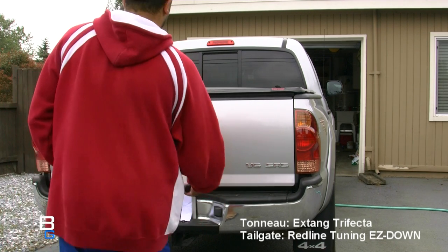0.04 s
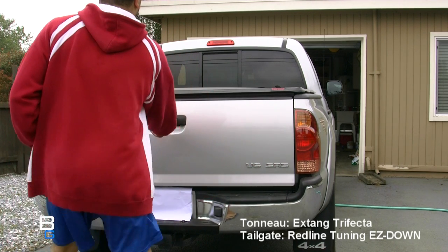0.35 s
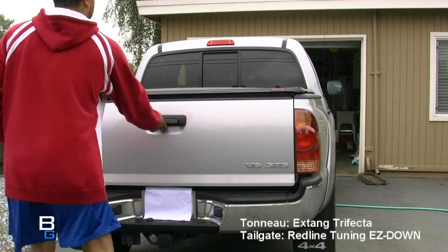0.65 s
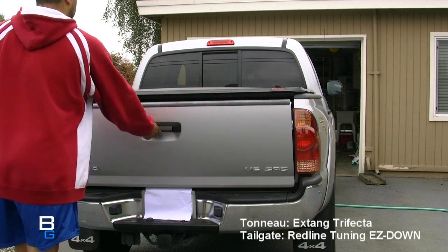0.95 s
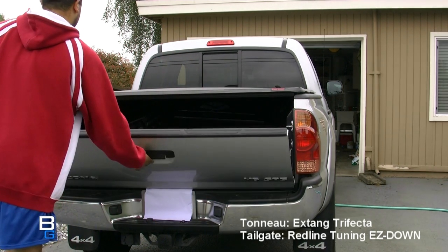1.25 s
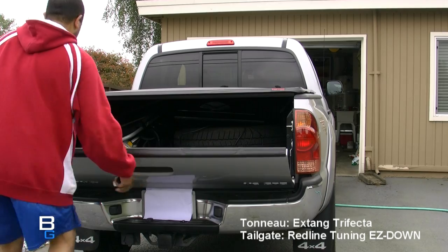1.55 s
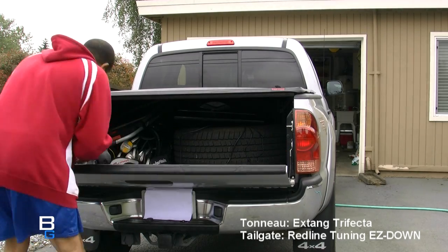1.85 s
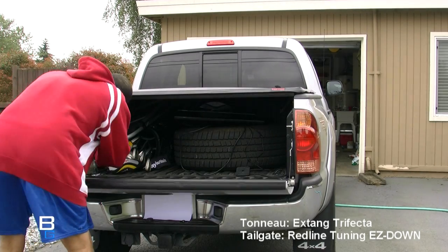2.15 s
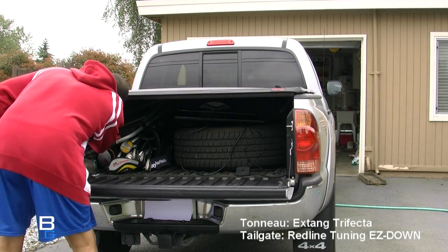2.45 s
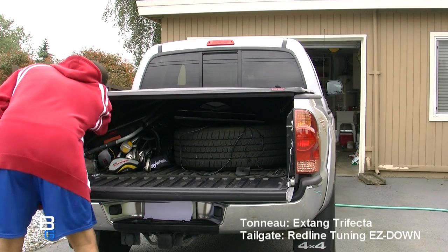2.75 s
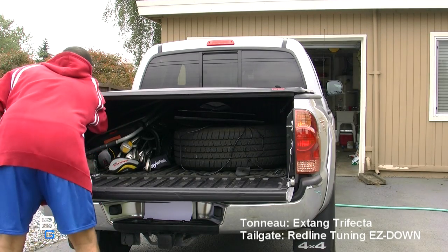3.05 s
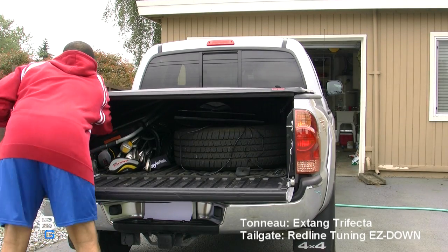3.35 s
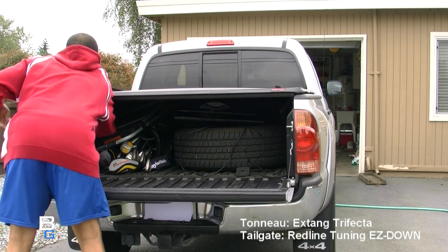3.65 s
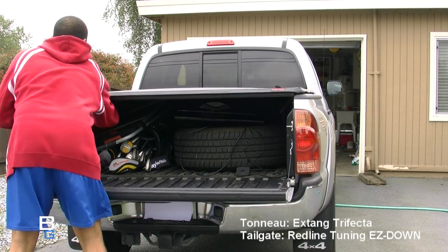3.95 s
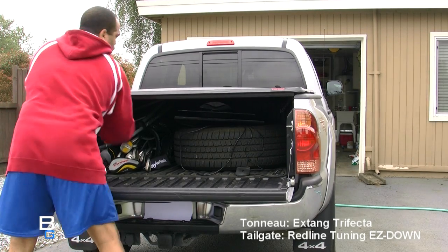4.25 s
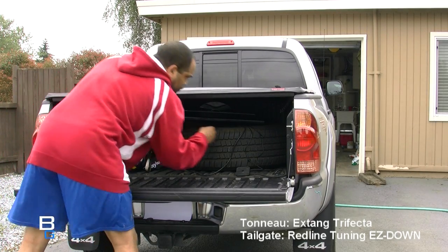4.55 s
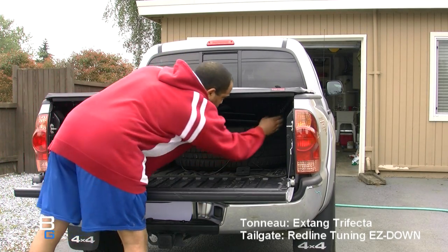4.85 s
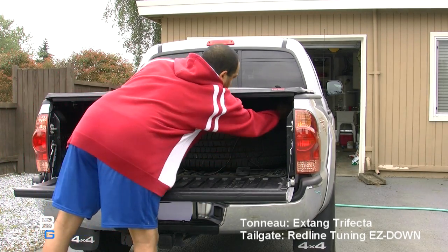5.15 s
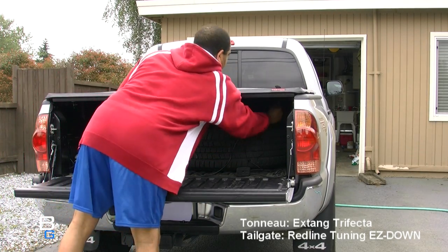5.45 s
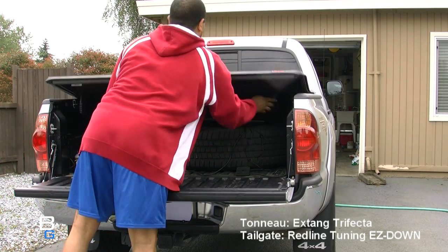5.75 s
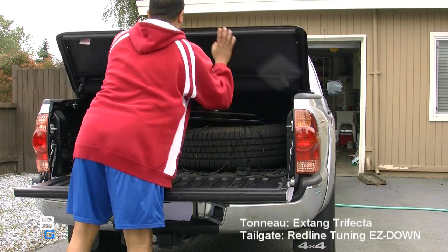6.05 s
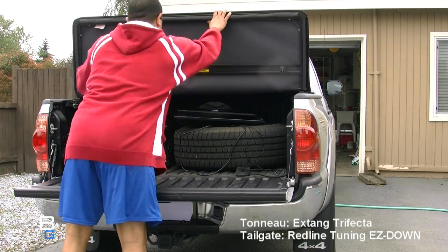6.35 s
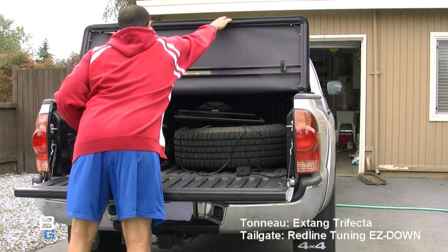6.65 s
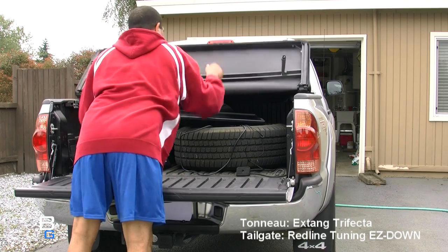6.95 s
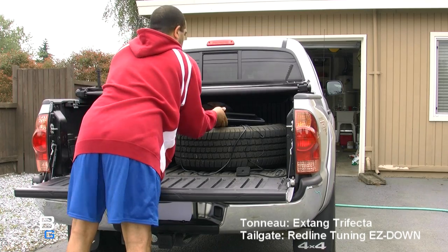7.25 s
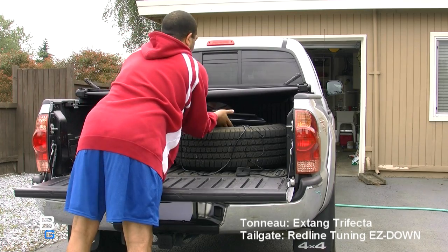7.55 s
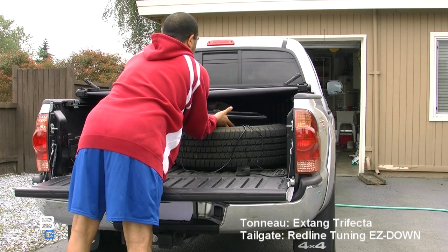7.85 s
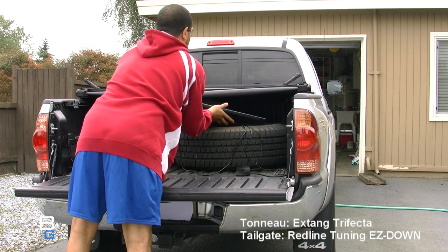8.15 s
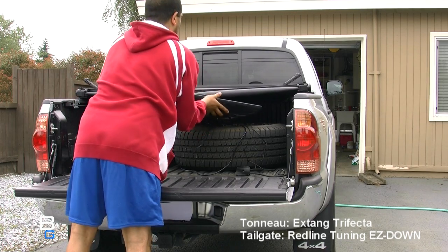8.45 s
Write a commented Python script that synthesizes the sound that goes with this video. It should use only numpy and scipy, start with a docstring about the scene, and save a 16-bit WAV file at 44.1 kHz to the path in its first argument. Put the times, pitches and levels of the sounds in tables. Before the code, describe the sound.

Shoe scuffs and rustling clothes open the scene, close to the back of a pickup. The handle clicks at about 0.4 seconds and the latch snaps open with a short metallic ring at 0.7. From 1.1 seconds the tailgate sinks with a brief, hoarse, slightly rising whine, landing with a loud clunk at 1.5. Soft knocks and thuds follow, then a cover clamp clicks at 3.1 and drops with a clunk at 3.8. Between 5 and 7 seconds there are quieter thuds, scrapes and ticks as the bed cover is lifted. It falls back with a rattling slam at 7.2. Sharp clacks come at 7.4 and 7.6, and gear bumps hollowly on the spare tyre until about 8.5. Throughout, small birds chirp faintly now and then over a distant outdoor hum.

```python
"""A pickup's tailgate is unlatched, sinks on a damper that whines by stick-slip, and lands on its cables.
The bed cover is unclamped and folded back with a slam, and gear is shifted on the spare tyre.
Each impact gives a burst of noise, coloured by the steel bed; struck parts ring in their damped modes.
Clothes rustle by friction, small birds chirp with echoes, and the neighbourhood hums far away."""
import sys
import numpy as np
from scipy import signal
from scipy.io import wavfile

SR = 44100
rng = np.random.default_rng(int(sys.argv[2]) if len(sys.argv) > 2 else 0)


def unload_audio(sound):
    """Save the sound as a 16-bit wav file, at the path given as the first command line argument."""
    columns = np.transpose(np.atleast_2d(sound))
    # keep every value between -1 and 1, then stretch to whole-number steps
    steps = np.round(np.clip(columns, -1, 1) * 32767)
    wavfile.write(sys.argv[1], SR, steps.astype(np.int16))


N = 384111
TIME = np.arange(N) / SR
EDGES = np.geomspace(31, 16400, 20)  # band edges, f/Hz
CENTRES = np.sqrt(EDGES[1:] * EDGES[:-1])
BAND_OCTAVES = np.log2(EDGES[1] / EDGES[0])

# stroke of the tailgate damper: t/s, slip rate f/Hz, level/dB (levels in all tables are relative)
DAMPER_STROKE = [(1.05, 268, -76), (1.12, 268, -50), (1.2, 277, -42.5), (1.3, 288, -41.5),
                 (1.36, 299, -39.5), (1.41, 320.4, -42), (1.47, 320, -42), (1.525, 322, -46),
                 (1.55, 323, -94)]
# radiation response of the tailgate skin: f/Hz, level/dB
SKIN_RESPONSE = [(800, -57), (1300, -1.5), (1750, 4), (2050, 7), (2350, -15), (3200, 4), (3900, -2),
                 (4400, -17), (5500, 7), (6200, -4)]


def from_db(db):
    """Amplitude ratio of a level."""
    return 10 ** (np.asarray(db) / 20)


def rms_one(x):
    """Normalisation to unit power."""
    return x / np.sqrt(np.mean(x ** 2) + 1e-20)


def in_time(rows, t=TIME):
    """Linear interpolation of each column in time."""
    times, *columns = np.transpose(rows)
    return [np.interp(t, times, column) for column in columns]


def at_hz(points, hz):
    """Interpolation on a logarithmic frequency axis."""
    f, value = np.transpose(points)
    return np.interp(np.log(hz), np.log(f), value)


def drift(rate, size=N):
    """Random modulation: Gaussian values, `rate` a second, joined by straight lines."""
    knots = rng.standard_normal(size // 8)
    return np.interp(np.arange(size) * rate / SR, np.arange(len(knots)), knots)


def add(out, onset, sound):
    """Superposition of a sound from `onset` seconds on."""
    start = round(onset * SR)
    sound = sound[..., max(-start, 0):N - start]
    start = max(start, 0)
    out[..., start:start + sound.shape[-1]] += sound


def noise_bands(correlation):
    """Half-octave stereo noise: the ratio of mid to side sets the left-right correlation."""
    white, bands = rng.standard_normal((2, 2, N)), []
    for k, hz in enumerate(CENTRES):
        bandpass = signal.butter(2, EDGES[k:k + 2], "band", fs=SR, output="sos")
        mid, side = signal.sosfilt(bandpass, white[k % 2])
        alike = np.clip(at_hz(correlation, hz), -1, 1)
        bands.append(rms_one(np.sqrt(1 + alike) * mid + np.sqrt(1 - alike) * side * [[1], [-1]]))
    return np.array(bands, dtype=np.float32)


def coloured(bands, band_db):
    """Spectral shaping: a weighted sum of noise bands, at unit power."""
    return rms_one(np.tensordot(from_db(band_db).astype(np.float32), bands, 1))


def off_centre(x, lag_s, pan_db):
    """Time and level differences: sound from the left arrives there earlier and louder."""
    return np.array([x, np.interp(TIME - lag_s, TIME, x)]) * from_db([[pan_db / 2], [-pan_db / 2]])


def contacts(bands, rows, spectrum, rise_share, grain_db, grain_hz, tail_db, bass_hold, bass_lag_s):
    """Modal overlap: tiny impacts on crowded panel modes merge into decaying noise with a reverberant tail."""
    # colour common to all contacts: f/Hz, level/dB
    common_colour = [(35, -36), (55, -39), (80, -41), (115, -3.5), (170, 0), (330, -6.5), (500, -3),
                     (2000, 0.5), (7000, 0.5), (9500, 3.5), (12500, -22.5), (15500, 5)]
    # reverberation of bed and yard: f/Hz, T60/s
    reverb_t60 = [(70, 0.78), (210, 0.32), (560, 0.24), (1500, 0.36), (4000, 0.38), (10000, 0.3)]
    out, hz = np.zeros((2, N)), CENTRES[:, None]
    t = TIME[:int(.7 * SR)]
    tail_power = from_db(2 * (tail_db - 60 * t / at_hz(reverb_t60, hz))) * (1 - np.exp(-t / 0.0064))
    grain = from_db(grain_db * drift(grain_hz))
    bass_share = 1 / (1 + (hz / 450) ** 2)
    colour_db = at_hz(spectrum, CENTRES) + at_hz(common_colour, CENTRES)
    for onset, db, tilt, t60 in rows:
        start = max(round(onset * SR), 0)
        n = min(len(t), N - start)
        rise = rise_share * t60  # soft contacts both start and end slowly
        # dispersion: low bending waves arrive later; they also last longer
        swell = max(rise, 1e-4) + bass_lag_s * bass_share
        decay = t60 * (1 + bass_hold * bass_share)
        shape = np.minimum(t[:n] / swell, 1) * from_db(-60 * np.clip((t[:n] - swell) / decay, 0, 2))
        rough = shape * (bass_share + (1 - bass_share) * grain[start:start + n])
        noise = bands[:, :, start:start + n]
        # the strength of the blow sets the energy in every band
        rough *= np.sqrt(np.sum(shape ** 2, axis=1) / np.sum((rough * noise[:, 0]) ** 2, axis=1))[:, None]
        envelope = np.sqrt(rough ** 2 + tail_power[:, :n] * (t60 + rise))
        tilt_db = tilt * np.log2(CENTRES / 1430)  # harder surfaces sound brighter
        gain = np.sqrt(BAND_OCTAVES) * from_db(db + colour_db + tilt_db)
        add(out, onset, np.einsum("bt,bct->ct", envelope * gain[:, None], noise))
    return out


def struck(modes, blows, rise_s):
    """Free vibration: each blow excites damped modes with random phase and 1.5 dB of scatter."""
    out, t = np.zeros(N), TIME[:SR]
    hz, mode_db, t60 = np.transpose(modes)[:, :, None]
    for onset, db in blows:
        phase = rng.uniform(0, 2 * np.pi, hz.shape)
        amplitude = from_db(db + mode_db + 1.5 * rng.standard_normal(hz.shape) - 60 * t / t60)
        ring = np.sum(amplitude * np.sin(2 * np.pi * hz * t + phase), axis=0)
        add(out, onset, ring * (1 - np.exp(-t / rise_s)))
    return out


def neighbourhood():
    """Ambient field: noise of far traffic and leaves from all sides, and briefly a thin sizzle."""
    # spectral density: f/Hz, level/dB
    density = [(15, -45), (25, -38), (80, 7), (114, 2.5), (476, -3.5), (863, -6), (1440, -13), (2350, -19),
               (3520, -23), (6050, -23.5), (11300, -27.5), (14400, -29), (16000, -44)]
    # left-right likeness: f/Hz, correlation (clipped at -1)
    correlation = [(30, .6), (60, 0.45), (110, 0.43), (200, -1.12), (380, -0.78), (1200, -0.55),
                   (2400, -1.5), (8000, 0.099), (15000, -0.62)]
    # swell of the sizzle: t/s, level/dB
    swell = [(4.05, -97), (4.3, -71), (4.6, -65.5), (4.9, -67), (5.15, -92)]
    hum = coloured(noise_bands(correlation), at_hz(density, CENTRES) + 10 * np.log10(CENTRES))
    bandpass = signal.butter(2, [10800, 12700], "band", fs=SR, output="sos")
    sizzle = rms_one(signal.sosfilt(bandpass, rng.standard_normal(N)))
    return from_db(-48.5) * hum + from_db(in_time(swell)[0]) * sizzle


def birds(echo_db, echo_t60, direct_db, waver_hz, wander, octave_db):
    """Frequency modulation: wavering whistles, convolved with echoes from house and fence."""
    # phrases: t/s from the onset, f/Hz, level/dB
    twitter = [(0, 6300, -18), (.016, 5400, 1), (.024, 3200, -0.5), (.047, 4500, 6.5), (.058, 4340, -1),
               (.064, 3650, 10), (.08, 3060, -2), (.089, 3620, -16), (.098, 3020, 4.5), (.117, 3800, 1),
               (.123, 2900, 7), (.133, 2800, -10)]
    whistle = [(0, 6700, -5), (.03, 7250, -3), (.065, 7200, -6), (.09, 6200, -5), (.105, 5750, -25)]
    slur = [(0, 2640, 1), (.018, 3360, -5), (.028, 5100, -10), (.045, 5180, -19), (.065, 4570, -0.5),
            (.09, 3800, 1), (.11, 3000, 1), (.12, 2900, -28)]
    high_slur = [(0, 9700, -3), (.012, 10250, -2), (.035, 9700, -6), (.06, 8500, -9), (.07, 8250, -20)]
    peep = [(0, 7700, -20), (.012, 8300, 9), (.032, 7900, 0), (.05, 7750, -20)]
    # calls of each phrase: t/s, level/dB
    twitters = [(-.045, -49.5), (0.538, -59), (2.397, -49.5), (2.692, -52.5), (3.621, -48), (4.195, -55.5),
                (4.68, -49), (5.008, -47), (5.775, -55), (6.90, -52)]
    whistles = [(2.91, -50.5)]
    slurs = [(8.231, -40.5)]
    high_slurs = [(8.25, -44.5)]
    peeps = [(3.635, -53), (5.369, -55)]
    song = np.zeros(N)
    for phrase, calls in ((twitter, twitters), (whistle, whistles), (slur, slurs),
                          (high_slur, high_slurs), (peep, peeps)):
        t = TIME[:int(phrase[-1][0] * SR)]
        hz, shape_db = in_time(phrase, t)
        for onset, db in calls:
            sung_hz = hz * (1 + wander * drift(25.4, len(t)))
            sung_hz += waver_hz * (drift(44.56, len(t)) + 0.82 * drift(498.4, len(t)))
            phase = 2 * np.pi * np.cumsum(sung_hz) / SR
            tone = np.sin(phase) + from_db(octave_db) * np.sin(2 * phase)
            add(song, onset, from_db(db + shape_db + 5.4 * drift(159.4, len(t))) * tone)
    t = TIME[:SR // 2]
    # echoes come mostly from ahead, so both sides share much of them
    response = rng.standard_normal(len(t)) + .5 * rng.standard_normal((2, len(t)))
    response *= from_db(-60 * t / echo_t60)
    response /= np.sqrt(np.sum(response[0] ** 2))
    echoes = signal.fftconvolve(song[None], response, axes=1)[:, :N]
    return from_db(direct_db) * song + from_db(echo_db) * echoes


def handling(bands, rumble_db, rub_db, swish_db, crinkle_db):
    """Amplitude-modulated noise: the bed rumbles under shifting weight while cloth rubs and swishes."""
    # strength of the movement: t/s, bass level/dB, treble level/dB
    movement = [(0.0, -57, -54.5), (0.36, -55.5, -61.5), (0.87, -43, -52), (1.33, -55, -53),
                (2.13, -56.5, -59.5), (3.39, -52, -57.5), (3.73, -51.5, -55), (4.27, -40, -57),
                (4.63, -57, -61), (5.65, -48, -55), (5.87, -53, -66), (6.28, -50, -56.5),
                (6.55, -55.5, -62.5), (7.2, -54.5, -63), (7.33, -41, -43), (7.45, -36, -45),
                (7.64, -49, -55), (8.71, -56, -62.5)]
    # band spectra: f/Hz, level/dB
    rumble = [(50, -17), (110, -12), (190, 2.5), (350, 0), (600, -6.5), (1200, -37)]
    rub = [(250, -47), (520, -2.5), (900, 5.5), (2000, 0.5), (3500, -15), (6000, -57)]
    swish = [(1400, -25), (3000, 2), (6000, -1), (10000, -3.5), (15000, -16)]
    bass_db, treble_db = in_time(movement)
    levels = (bass_db + rumble_db, (bass_db + treble_db) / 2 + rub_db, treble_db + swish_db)
    out = np.zeros((2, N))
    for level_db, spectrum, rate in zip(levels, (rumble, rub, swish), (30, 90, 400)):
        out += from_db(level_db + crinkle_db * drift(rate)) * coloured(bands, at_hz(spectrum, CENTRES))
    return out


def sliding(bands):
    """Friction noise: shoes and sleeves scuff; clamps and cover scrape along the rails."""
    # strokes: t/s, level/dB, tilt/(dB/octave), T60/s
    scuffs = [(-.01, -41, 0.8, 0.19), (.92, -46.5, -1.5, 0.15), (1.0, -52, 3, 0.23),
              (1.348, -42, -1.5, 0.17), (1.821, -45, 1.5, 0.19), (1.885, -50.5, 0.5, 0.42),
              (3.36, -44.5, 0, 0.2), (3.554, -44.5, -1, 0.2), (3.628, -45.5, -3.3, 0.15),
              (3.899, -52, 0, 0.32), (5.35, -58, -3, 0.4), (5.655, -51, 3, 0.13), (5.778, -48.5, 2, 0.11),
              (6.39, -49, 0.5, 0.32), (6.731, -45.5, -1.5, 0.085), (6.868, -51.5, -3, 0.23),
              (7.37, -38, 2, 0.09), (7.393, -31.5, 1.7, 0.065), (8.35, -49, 1.7, 0.5),
              (8.405, -48, -0.9, 0.23)]
    scrapes = [(3.865, -42.5, -1.5, 0.3), (5.343, -49, 1, 0.44), (5.48, -44.5, -0.5, 0.5),
               (5.593, -44, -1, 0.14), (5.66, -46.5, 0.5, 0.33), (6.165, -44.5, -1.5, 0.23)]
    # band spectra: f/Hz, level/dB
    scuff_tone = [(170, -6), (490, -3.5), (1430, -2), (2600, -3.5), (4500, -2), (8300, 1), (14000, -3)]
    scrape_tone = [(170, -10), (490, -17), (1200, -11.5), (2500, 0), (3500, -5), (5500, -13), (14000, -9)]
    return (contacts(bands, scuffs, scuff_tone, rise_share=0.087, grain_db=3.5, grain_hz=330,
                     tail_db=-4, bass_hold=0.089, bass_lag_s=0.013)
            + contacts(bands, scrapes, scrape_tone, rise_share=0.057, grain_db=4.5, grain_hz=300,
                       tail_db=2, bass_hold=.1, bass_lag_s=.004))


def soft_loads(bands):
    """Soft contact excites mainly low frequencies: the bed thuds and sways under a body or load."""
    # loadings: t/s, level/dB, tilt/(dB/octave), T60/s
    thuds = [(0.07, -30.5, 1.5, 0.02), (0.466, -37, -0.5, .09), (.525, -31, 1.5, 0.038),
             (0.729, -23.5, -0.5, 0.044), (2.714, -32.5, -0.4, 0.13), (2.995, -50, -1.5, 0.14),
             (3.302, -46, -2, 0.16), (5.176, -42, 0.5, 0.31), (5.336, -31, 0, 0.27),
             (6.019, -44, -0.5, 0.042), (7.146, -27, 1.5, 0.21), (7.190, -24.5, -1.5, 0.11),
             (7.216, -22.5, 0.7, 0.17)]
    sways = [(.58, -37.5, 0.5, 1), (1.06, -41.5, -4, 0.34), (1.561, -32.5, 0, 0.45), (4.22, -44, 1, 0.94),
             (6.03, -57, -1, 0.87), (7.42, -31, 2, 0.25), (7.55, -38.5, 0.5, 0.21)]
    # band spectra: f/Hz, level/dB
    thud_tone = [(70, -4.5), (170, -1), (360, 0.5), (600, -9), (1430, -16), (3800, -19), (8300, -19.5)]
    sway_tone = [(70, 10), (170, -5.5), (490, -2), (1430, -7.5), (3800, -33), (8300, -45)]
    return (contacts(bands, thuds, thud_tone, rise_share=0.041, grain_db=-0.5, grain_hz=590,
                     tail_db=5, bass_hold=0.16, bass_lag_s=0.0059)
            + contacts(bands, sways, sway_tone, rise_share=.1, grain_db=3, grain_hz=100,
                       tail_db=-9, bass_hold=.1, bass_lag_s=.004))


def small_impacts(bands):
    """Brief contact excites high frequencies: handle, clamps and frame click; latch, hinges, vinyl tick."""
    # impacts: t/s, level/dB, tilt/(dB/octave), T60/s
    clicks = [(.132, -45, 1.5, 0.018), (.430, -30.5, -2.5, 0.016), (0.555, -42.5, 3.5, 0.026),
              (1.432, -32, -3, 0.031), (1.92, -38, 3.5, 0.02), (3.063, -43.5, -0.5, 0.04),
              (3.121, -31, 2, 0.062), (3.135, -39, 5, 0.049), (3.141, -29.5, -1.5, 0.035),
              (3.157, -39, 0.5, .044), (5.704, -41, 1.5, 0.057), (5.771, -38.5, -3.5, 0.057),
              (6.02, -39.5, -1.5, 0.066), (6.046, -38, 1, .06), (6.178, -34.5, 4.5, 0.026),
              (7.411, -10, 1, 0.015), (7.522, -22, -3, 0.03), (7.559, -16.5, 0.8, 0.041)]
    ticks = [(0.649, -44.5, 3.5, .05), (.711, -12, -1, 0.038), (4.519, -39.5, -2, .03),
             (4.927, -44.5, 0, .012), (5.855, -40.5, -2.5, 0.026), (6.249, -46.5, 4, 0.012),
             (6.414, -29.5, 0.8, 0.0035), (6.745, -25.5, -1, 0.012), (7.172, -18, 0.5, 0.035),
             (7.270, -27.5, 0, .05), (7.295, -27.5, 1.5, 0.035), (7.361, -45, -0.5, .02),
             (7.396, -36.5, .5, 0.097), (8.565, -39.5, -4, 0.064)]
    # band spectra: f/Hz, level/dB
    click_tone = [(170, -20.5), (490, -11.5), (1430, -2), (3800, -1.5), (8300, -9), (14000, -16)]
    tick_tone = [(170, -17), (490, -6.5), (1430, -12), (3800, -3.5), (8300, 0.5)]
    return (contacts(bands, clicks, click_tone, rise_share=0.029, grain_db=5.5, grain_hz=1000,
                     tail_db=-6, bass_hold=.49, bass_lag_s=.0012)
            + contacts(bands, ticks, tick_tone, rise_share=0.034, grain_db=8, grain_hz=1400,
                       tail_db=-5, bass_hold=0.45, bass_lag_s=0.00082))


def large_impacts(bands):
    """Impulsive excitation of panels: broadband slams, and hollow knocks of tailgate, cover and gear."""
    # impacts: t/s, level/dB, tilt/(dB/octave), T60/s
    slams = [(.710, -17.5, 1.05, .17), (1.526, -11, 0.15, 0.07), (3.781, -26, -4, 0.068),
             (7.169, -13, -0.8, 0.096)]  # latch lets go, tailgate lands, clamp drops, cover falls back
    knocks = [(0.13, -41, -4, 0.062), (.648, -36.5, -2, 0.094), (0.869, -38, -2.5, 0.3),
              (1.012, -43, -7, 0.11), (1.040, -28.5, -5.5, 0.056), (1.063, -42, -5.5, 0.13),
              (2.024, -37, -1, 0.24), (2.365, -36.5, -1, .17), (2.67, -43, -6, 0.28),
              (3.762, -21, -1.3, 0.12), (3.799, -31, -4.5, 0.16), (4.17, -32, -1, 0.14),
              (5.592, -40, -3, 0.1), (6.084, -44.5, -4.5, .08), (6.749, -40, -1, 0.17),
              (7.596, -35.5, 2, .12), (7.833, -41, 2.5, 0.25), (7.958, -36.5, -0.5, .12),
              (7.984, -44.5, 6.5, 0.068), (8.037, -41, .3, 0.19), (8.131, -32, 0, .12)]
    # band spectra: f/Hz, level/dB
    slam_tone = [(70, -12), (170, -5), (490, 0.5), (1430, 0), (3800, -5), (8300, -3.5), (14000, -3)]
    knock_tone = [(70, -10), (170, -20), (490, -1), (900, -1.5), (1430, -2.5), (3800, -14), (8300, -15.5),
                  (14000, -27)]
    return (contacts(bands, slams, slam_tone, rise_share=0.08, grain_db=1, grain_hz=240,
                     tail_db=-3, bass_hold=0.5, bass_lag_s=0.0033)
            + contacts(bands, knocks, knock_tone, rise_share=0.022, grain_db=-0.5, grain_hz=250,
                       tail_db=-10.5, bass_hold=0.69, bass_lag_s=0.0096))


def through_bed(x, direct_db, ring_db):
    """Forced vibration: the ribbed bed passes each contact on and adds its own resonances."""
    # resonances: f/Hz, bandwidth/Hz, level/dB
    resonances = [(173.6, 9.6, -1), (269.5, 5.6, 2.5), (380, 130, -6), (473, 6.6, -13), (561, 28, -4),
                  (723, 11, 2), (901, 30, 3), (1220, 10, -35), (1221, 6, 4), (1350, 4.7, 2),
                  (1680, 54, -3.5), (2070, 390, -13.5), (2496, 6.9, 0.5), (2805, 120, -5), (2930, 26, -20),
                  (3230, 340, -2.5), (3800, 32, 5), (4170, 20, -8)]
    out = from_db(direct_db) * x
    for hz, width, db in resonances:
        radius = np.exp(-np.pi * width / SR)
        gain = from_db(db + ring_db) * (1 - radius ** 2) / 2
        feedback = [1, -2 * radius * np.cos(2 * np.pi * hz / SR), radius ** 2]
        out += signal.lfilter([gain, 0, -gain], feedback, x + 1e-18)
    return out


def cargo():
    """Modal ringing of the gear, the bed liner and a hollow plastic panel bumping on the tyre."""
    # modes: f/Hz, level/dB, T60/s
    gear = [(883, -0.5, 0.081), (980, -28, 0.039), (1140, -23, 0.11), (2150, -16.5, 0.059),
            (2643, -40, .15)]
    panel = [(528, -5, .09), (565, 0, .12), (600, -4, .09), (860, -6, .08), (1140, -9, .07)]
    liner = [(182, -13, 0.27), (511, -5.5, 0.13), (700, 4.5, 0.042), (768, 2.5, 0.052), (843, -6, 0.091),
             (976, -6, 0.054)]
    # blows: t/s, level/dB
    gear_blows = [(8.135, -15.5), (8.141, -50)]
    panel_blows = [(6.748, -45), (6.875, -41), (7.412, -24), (7.561, -23), (7.836, -32.5), (7.863, -42),
                   (7.960, -52), (7.987, -33), (8.041, -37), (8.440, -34), (8.475, -37), (8.515, -41)]
    liner_blows = [(2.670, -28.5), (2.722, -33.5)]
    return (struck(gear, gear_blows, rise_s=0.0029)
            + struck(panel, panel_blows, rise_s=0.0081)
            + struck(liner, liner_blows, rise_s=0.0012))


def bed_cover():
    """Modal ringing of a clamp as it is undone, then of the falling cover and its rail and bows."""
    # modes: f/Hz, level/dB, T60/s
    clamp = [(1057, 7, 0.023), (1140, 1, 0.028), (1870, -17, .04), (2270, -5, .03)]
    cover = [(72.6, 0.5, 0.31), (182, -7, 0.58), (469, 3.5, 0.15), (526, 3.5, 0.13), (565, -27, 0.23),
             (620, -5, 0.32), (690, -21, 0.28), (762, 0, 0.19), (1025, -20, 0.22), (1370, -19, 0.3),
             (1600, -29, 0.35), (1610, -38, 0.91), (1943, -22, 0.86), (2140, -22, 0.84)]
    rail = [(3180, 2.5, 0.041), (3370, -0.5, 0.034), (3090, -1.5, 0.035), (6850, -8, 0.039)]
    # blows: t/s, level/dB
    clamp_blows = [(3.122, -24.5)]
    cover_blows = [(7.174, -20.5), (7.213, -37.5)]
    rail_blows = [(7.197, -22), (7.216, -22.5), (7.27, -22), (7.293, -20.5)]
    return (struck(clamp, clamp_blows, rise_s=0.00047)
            + struck(cover, cover_blows, rise_s=0.003)
            + struck(rail, rail_blows, rise_s=0.00043))


def damper_rasp(bands, rasp_db):
    """Friction noise of the sliding seal, radiated by the tailgate skin as a hoarse hiss."""
    low_cut_db = -40 * np.maximum(np.log2(1300 / CENTRES), 0)
    high_cut_db = -18 * np.maximum(np.log2(CENTRES / 4200), 0)
    spectrum_db = at_hz(SKIN_RESPONSE, CENTRES) + low_cut_db + high_cut_db
    _, level_db = in_time(DAMPER_STROKE)
    return from_db(level_db + rasp_db) * coloured(bands, spectrum_db)


def damper_whine(jitter, flutter_db, second_ratio, second_db):
    """Stick-slip oscillation: the seal slips faster as the tailgate sinks; two close pitches beat."""
    # partials: harmonic number, level/dB
    harmonics = [(3, -22), (4, 0), (5, -4), (6, -7.5), (7, -9), (8, -8), (11, -18), (12, -27), (13, -8),
                 (14, -8), (19, -22), (20, -22)]
    moving = (TIME > DAMPER_STROKE[0][0]) & (TIME < DAMPER_STROKE[-1][0])
    slip_hz, level_db = in_time(DAMPER_STROKE, TIME[moving])
    size, out = len(slip_hz), np.zeros(N)
    for ratio, db in ((1, 0), (second_ratio, second_db)):
        phase = 2 * np.pi * np.cumsum(ratio * slip_hz * (1 + jitter * drift(266.6, size))) / SR
        for order, order_db in harmonics:
            partial_db = level_db + db + order_db + at_hz(SKIN_RESPONSE, order * slip_hz)
            out[moving] += from_db(partial_db + flutter_db * drift(60, size)) * np.sin(order * phase)
    return out


def tailgate():
    """Modal ringing: the plastic handle takes up its slack, the latch snaps open and the gate lands."""
    # modes: f/Hz, level/dB, T60/s
    handle = [(1260, -2, .025), (1600, 5.5, 0.017), (1960, 5, 0.011), (2630, -3, .018)]
    latch = [(1126, -9, .12), (1890, -5, .11), (2040, -6, .1), (2482, -9, .12), (2970, -4, .12),
             (4960, -8, .1), (5997, -14, .18), (6150, -14, .18), (8830, -18, .18), (9010, -17, .2),
             (9260, -17, .22), (9390, -17, .2), (9510, -17, .2), (9720, -17, .2), (9890, -17, .2),
             (10050, -17, .2), (10400, -18, .2)]
    gate = [(146, -32, 0.41), (180, -28, 0.38), (212, -20, 0.52), (389, 4, 0.22), (433, -32, 0.17),
            (467, 21, 0.1), (497, 11.5, 0.2), (535, 9, 0.2), (609, 12, 0.13), (646, -20, .18),
            (750, -9, 0.42), (948, -4, 0.33), (953, -11.5, 0.17), (1070, -12, .13), (1214, 13, 0.11),
            (1730, -49, 0.14), (2010, -36, 0.21), (2190, -7, 0.16), (2840, -29, 0.47)]
    # blows: t/s, level/dB
    handle_blows = [(.430, -27.5), (.450, -35.5)]
    latch_blows = [(0.712, -16.5), (.740, -22)]
    gate_blows = [(.718, -34.5), (1.043, -43), (1.530, -21.5), (3.785, -33.5), (3.801, -46)]
    return (struck(handle, handle_blows, rise_s=0.0002)
            + struck(latch, latch_blows, rise_s=0.0018)
            + struck(gate, gate_blows, rise_s=0.016))


def scene():
    """Superposition of the truck straight ahead and the yard all around."""
    # left-right likeness of the truck's noise: f/Hz, correlation
    correlation = [(30, .78), (70, .91), (150, .955), (500, .945), (2000, .94), (4000, .88), (8000, .62),
                   (14000, .6)]
    bands = noise_bands(correlation)
    touch = sliding(bands) + soft_loads(bands) + small_impacts(bands) + large_impacts(bands)
    touch += handling(bands[:, :, ::-1], rumble_db=-1.5, rub_db=-2, swish_db=-2, crinkle_db=3)
    truck = through_bed(touch, direct_db=-2, ring_db=-6)
    truck += cargo() + bed_cover() + tailgate()
    whine = damper_whine(jitter=0.0088, flutter_db=5, second_ratio=1.03, second_db=-6)
    truck += off_centre(whine, lag_s=.0001, pan_db=6) + damper_rasp(bands, rasp_db=-5)
    yard = neighbourhood()
    yard += birds(echo_db=-6, echo_t60=0.33, direct_db=-4.5, waver_hz=132.5, wander=0.027, octave_db=-35)
    return truck * from_db([[.2], [-.2]]) + yard


def record(dry):
    """Saturation rounds the peaks; band limiting cuts the deepest bass and the top."""
    rounded = 1.094 * np.tanh(dry / 1.324)
    highpass = signal.butter(2, 32, "high", fs=SR, output="sos")
    lowpass = signal.ellip(10, .1, 80, 16200, fs=SR, output="sos")
    return signal.sosfilt(lowpass, signal.sosfilt(highpass, rounded))


dry = scene()
out = record(dry)
unload_audio(out)
```